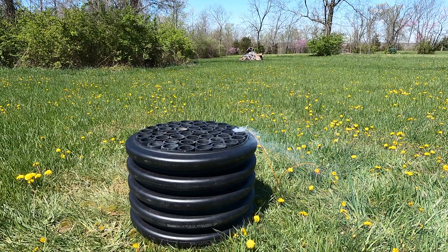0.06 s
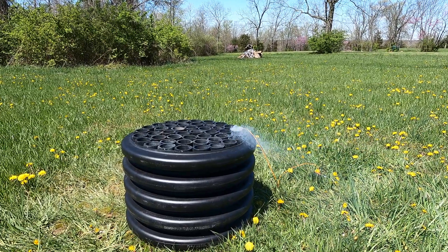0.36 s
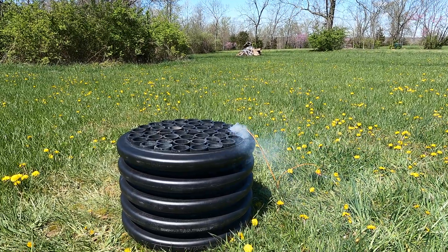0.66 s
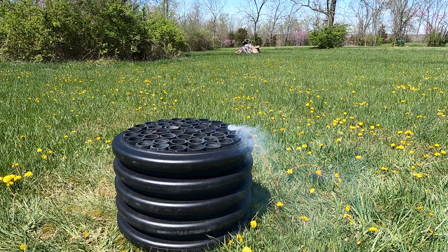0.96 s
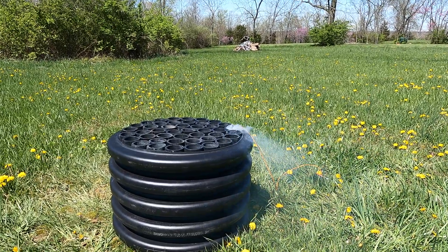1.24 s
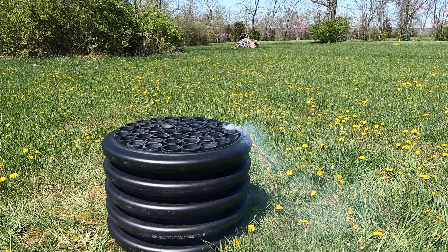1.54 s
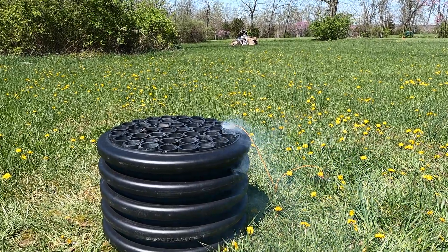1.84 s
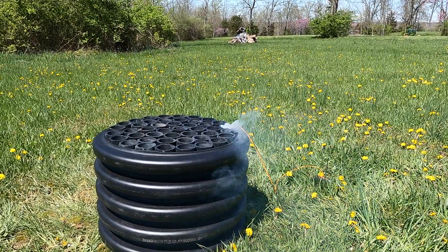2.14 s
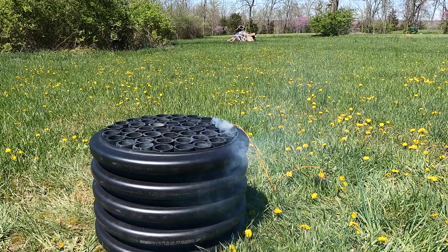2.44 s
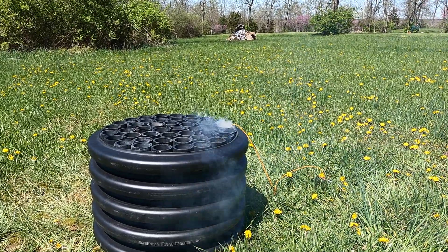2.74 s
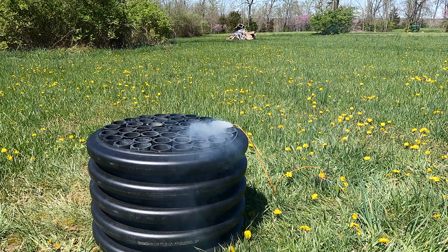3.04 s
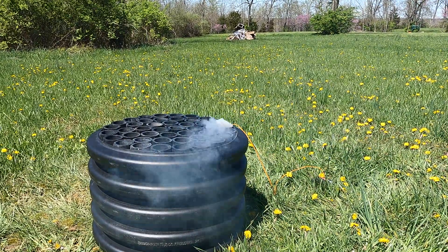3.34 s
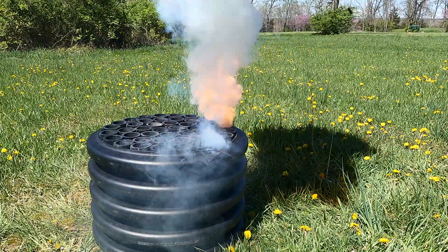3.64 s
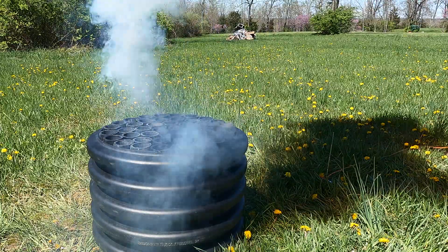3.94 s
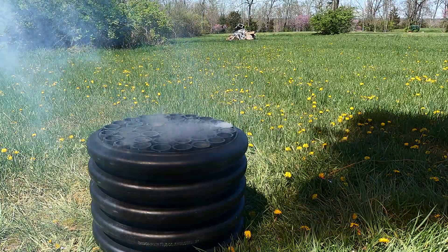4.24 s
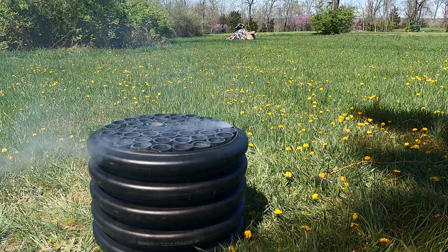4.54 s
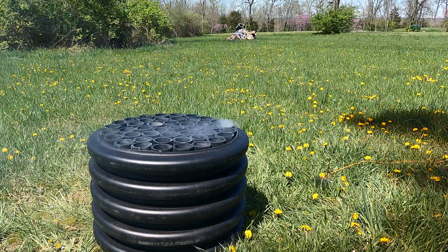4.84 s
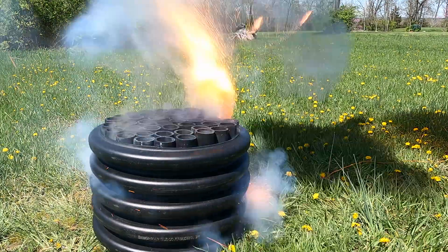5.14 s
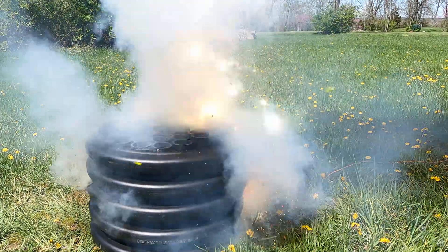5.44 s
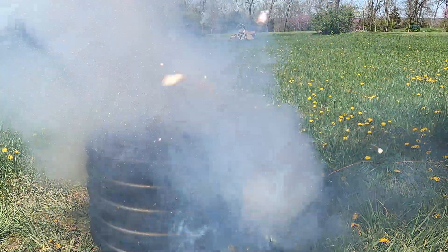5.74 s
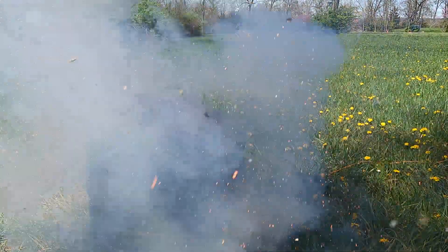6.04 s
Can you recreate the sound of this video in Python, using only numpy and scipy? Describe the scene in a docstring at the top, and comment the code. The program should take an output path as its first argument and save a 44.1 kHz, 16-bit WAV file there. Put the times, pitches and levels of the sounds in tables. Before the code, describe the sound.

From the start, a firework fuse hisses and sputters in uneven surges, slightly to the right, drawing a hollow, wavering hum from the tubes of a plastic mortar rack. Light wind rumbles on the microphone throughout. At about 3.6 seconds the lift charge fires with a loud, sharp bang, a low thump and a short gust of gas, and the rack rings very briefly. A quieter, duller hiss continues inside the tube, falling in pitch until about 4.3 seconds. The wind swells just before 5 seconds. At about 5.2 seconds the shell bursts with a second loud, sharp crack. A low, fluttering roar of burning stars follows at once, with soft thumps and gritty crackles, strongest around 5.5 seconds, and a thin fizz rises toward the end at about 6 seconds. The setting is an open field, with only a faint echo after each blast.

```python
"""A sputtering hiss comes first: a firework fuse burns in a plastic mortar rack in an open field, and its
jet excites the resonances of the hollow tubes. The lift charge fires with a crack and a gust of gas;
a delay fuse hisses on inside the tube, then the shell bursts in the rack and its stars burn with a
fluttering roar. A light wind rumbles throughout, and a tree line returns a faint echo of the blasts."""
import sys
import numpy as np
from scipy import signal
from scipy.fft import rfft, irfft, next_fast_len
from scipy.io import wavfile
from scipy.ndimage import uniform_filter1d

SR = 44100
rng = np.random.default_rng(int(sys.argv[2]) if len(sys.argv) > 2 else 0)


def unload_audio(sound):
    """Save the sound as a 16-bit wav file, at the path given as the first command line argument."""
    columns = np.transpose(np.atleast_2d(sound))
    # keep every value between -1 and 1, then stretch to whole-number steps
    steps = np.round(np.clip(columns, -1, 1) * 32767)
    wavfile.write(sys.argv[1], SR, steps.astype(np.int16))


N = 268569

# Levels are relative; a spectrum lists power density against frequency.
# the open fuse between surges: t/s, lowest tube mode/dB, upper modes/dB, jet hiss/dB
FUSE_LEVELS = [(0, -42, -41, -44.5), (.11, -49.5, -43.5, -45.5), (.4, -52.5, -42.5, -45.5),
               (.915, -48, -46, -47.5), (.94, -50, -47.5, -51.5), (1.12, -43, -43.5, -52),
               (1.55, -45, -46.5, -53.5), (1.575, -45.5, -45.5, -55), (1.78, -48, -48.5, -56),
               (1.87, -40, -39.5, -50), (2.03, -41.5, -43.5, -48), (2.2, -53, -44.5, -47.5),
               (2.6, -56.5, -49, -50), (2.9, -53, -44, -48.5), (3.25, -59, -47.5, -52),
               (3.33, -43, -40.5, -42.5), (3.47, -46.5, -43.5, -44.5), (3.6, -43.5, -47.5, -52)]
# the lowest tube mode, sharper in hot gas: t/s, f/Hz
TUBE_FUNDAMENTAL = [(0, 642.5), (.8, 613.2), (1.75, 621.3), (2.4, 593.3), (3.55, 591), (3.78, 730),
                    (4.05, 668), (4.5, 635), (5.15, 605)]
# the powder burns in surges, a negative rise being a stall: t/s, rise/dB, length/s
FUSE_SURGES = [(0.168, 5.5, 0.037), (0.265, 4, 0.038), (0.461, 6.5, 0.037), (0.57, 6, 0.047),
               (0.73, 5, 0.07), (0.86, 4.5, 0.1), (0.996, -5, .065), (1.05, 8, 0.048), (1.181, 4.5, 0.071),
               (1.255, -2.5, 0.035), (1.298, 4, 0.045), (1.382, 5.5, 0.049), (1.463, 5.5, 0.05),
               (1.53, 5.5, 0.038), (2.075, 2.5, .045), (2.215, -5, 0.031), (2.236, 4.5, 0.03),
               (2.318, 5, 0.018), (2.442, 6, 0.068), (2.686, 5, 0.029), (2.854, 4, 0.04), (2.952, 4, 0.024),
               (3.14, -7, 0.02), (3.171, 4, 0.038), (3.433, 4, 0.02), (3.518, 3, 0.042), (3.77, 3, .06),
               (3.87, 4.5, 0.071), (4.204, 1, 0.086)]
# spectrum of blazing powder: f/Hz, level/dB
BLAZE_SPECTRUM = [(200, -8), (450, 0.5), (750, 1), (1300, 1), (2500, -1), (4200, -7.5), (6000, -15),
                  (10000, -41), (15000, -60)]
# left-right coherence of the fuse flame: f/Hz, coherence
FLAME_COHERENCE = [(30, 0.99), (125, 1), (640, 0.97), (1400, 1), (3100, 0.94), (7000, 1), (9500, 0.93),
                   (13000, 0.65)]
HUM_GROWTH, HISS_GROWTH = 1.67, 1.05  # dB for each dB of surge


def amp(db):
    """Amplitude ratio of a level in decibels."""
    return 10 ** (np.asarray(db) / 20)


def unit(x):
    """Normalisation to rms 1."""
    return x / np.sqrt(np.mean(x ** 2) + 1e-20)


def clock():
    """The time of every sample."""
    return np.arange(N) / SR


def along(points, hz):
    """Interpolation of (f/Hz, value) points on a logarithmic frequency axis."""
    f, values = np.transpose(points)
    return np.interp(np.log(hz + 1), np.log(f + 1), values)


def curves(rows, t):
    """Linear interpolation, at the times t, of each column after the first."""
    times, *columns = np.transpose(rows)
    return [np.interp(t, times, column) for column in columns]


def gate(start, end, fade=0.025):
    """A trapezoidal window between two times."""
    return np.clip((clock() - start) / fade, 0, 1) * np.clip((end - clock()) / fade, 0, 1)


def wobble(rate, size=N):
    """Random modulation with rate knots a second."""
    knots = rng.standard_normal(int(size * rate / SR) + 2)
    return np.interp(np.arange(size) * rate / SR, np.arange(len(knots)), knots)


def filtered(x, response):
    """Linear filtering: the spectrum of x is multiplied by a frequency response."""
    size = x.shape[-1]
    padded = next_fast_len(size + 4096, real=True)
    return irfft(rfft(x, padded) * response(np.fft.rfftfreq(padded, 1 / SR)), padded)[..., :size]


def noise(grain_db, size=N):
    """Two white noises, made grainy by amplitude modulation on a millisecond scale."""
    return rng.standard_normal((2, size)) * amp(grain_db * wobble(700, size))


def spread(hz, coherence):
    """Mid and side gains: the higher the coherence, the less power goes to the side."""
    alike = np.clip(along(coherence, hz), -1, 1)
    return np.sqrt([1 + alike, 1 - alike])


def rush(spectrum, coherence, grain_db=0, size=N):
    """Turbulence radiates broadband noise, here in stereo at rms 1."""
    mid, side = filtered(noise(grain_db, size), lambda hz: amp(along(spectrum, hz)) * spread(hz, coherence))
    return unit(np.array([mid + side, mid - side]))


def peak(hz, centre, width):
    """Gain of one resonance with steep skirts."""
    return 1 / (1 + ((centre ** 2 - hz ** 2) / (1.58 * width * (hz + 1))) ** 2)


def surge_db(rows, t):
    """Level follows the burning rate: each surge flares quickly and sinks more slowly."""
    lag_s, attack_share = 0.0031, 0.39
    grid = clock()[::32]

    def bell(age, length):
        width = length * np.where(age < 0, attack_share, 1 - attack_share)
        return .5 ** (age / width) ** 2
    return np.interp(t, grid, sum(db * bell(grid - s - lag_s, length) for s, db, length in rows))


def sputter_db(per_s=35, jump_db=2.7, fade_s=0.02):
    """Spurts of flame form a Poisson process: each lifts the level at once, then fades."""
    spurts = rng.random(N) < per_s / SR
    rise = signal.lfilter([jump_db], [1, -np.exp(-1 / (fade_s * SR))], spurts)
    return rise - rise.mean()


def puff(s, db, rise, t60, spectrum, grain_db):
    """A noise transient: exponential growth up to time s, then exponential decay."""
    # left-right coherence of the transient: f/Hz, coherence
    coherence = [(30, .95), (125, 1), (500, 0.98), (2000, 0.78), (5000, 0.81), (9000, 0.67), (12500, 0.4)]
    size, start = SR // 4, round(s * SR) - SR // 20
    t = (start + np.arange(size)) / SR - s
    envelope = np.exp(np.minimum(t, 0) / rise) * amp(db - 60 * np.maximum(t, 0) / t60)
    out = np.zeros((2, N + size))
    out[:, start:start + size] = envelope * rush(spectrum, coherence, grain_db, size)
    return out[:, :N]


def thud(s, hz, db, rise):
    """A heavily damped pressure oscillation grows and dies within a few cycles."""
    t = np.arange(SR // 5) / SR
    swing = -amp(db) * t / rise * np.exp(1 - t / rise) * np.sin(2 * np.pi * hz * t)
    return np.pad(swing, (round(s * SR), N))[:N]


def wind():
    """Turbulent pressure on the microphone is heard as a low rumble."""
    # the low rumble swells, dips and swells again: t/s, level/dB
    levels = [(0, -44.5), (2.7, -44), (3.15, -42.5), (3.35, -49), (4, -50), (4.55, -48), (4.72, -37.5),
              (4.92, -36.5), (5.2, -46.5), (6.09, -45)]
    # spectrum of the rumble: f/Hz, level/dB
    spectrum = [(10, -5.5), (25, -1), (45, -1.5), (80, -4.5), (130, -16.5), (200, -21.5), (330, -39.5),
                (800, -69), (2000, -71)]
    # its left-right coherence: f/Hz, coherence
    coherence = [(30, 0.97), (130, 0.9)]
    return amp(curves(levels, clock())[0] + 3.5 * wobble(9)) * rush(spectrum, coherence)


def tree_line(x, delay_s=.1):
    """Scattering from distant trees returns a delayed, diffuse echo."""
    # decay of the echo: f/Hz, t60/s
    decay = [(100, .9), (1000, 1), (8000, 1)]
    hz, t, z = signal.stft(rng.standard_normal((2, SR)), SR, nperseg=256)
    tail = signal.istft(z * amp(-60 * t / along(decay, hz)[:, None]), SR, nperseg=256)[1]
    tail = np.pad(tail / np.linalg.norm(tail[0]), ((0, 0), (round(delay_s * SR), 0)))
    return signal.fftconvolve(x.mean(axis=0)[None], tail, axes=1)[:, :N]


def flame_rush(fade_db_per_s=1.1, shielding_db=11.5):
    """Low combustion noise follows the surges and is shielded once the flame sinks into the tube."""
    # spectrum of the flame: f/Hz, level/dB
    spectrum = [(40, -15), (90, 0.5), (140, -3.5), (210, -2), (265, -10.5), (289, -4.5), (320, -14),
                (440, -19), (700, -24), (2000, -86)]
    t = clock()
    hidden = np.clip((t - 3.81) / 0.31, 0, 1)
    level = -43 - fade_db_per_s * t + 0.78 * surge_db(FUSE_SURGES, t) - shielding_db * hidden
    return amp(level + 1.84 * wobble(20)) * rush(spectrum, FLAME_COHERENCE)


def patches(shape):
    """Turbulence favours ever new bands, a few hundred Hz wide and a tenth of a second long."""
    field = rng.standard_normal(shape)
    for _ in range(2):
        field = uniform_filter1d(uniform_filter1d(field, size=9, axis=0), size=20, axis=1)
    return unit(field)


def burning(levels, upper_modes, jet, hum_width_hz, grain_db, patchy_db, trim_db):
    """Source and filter: jet noise drives the tube; hum, upper modes and hiss add in power."""
    hz, t, z = signal.stft(noise(grain_db), SR, nperseg=1024, noverlap=768)
    hz = hz[:, None]
    hum = peak(hz, curves(TUBE_FUNDAMENTAL, t)[0], hum_width_hz)
    shifting = amp(patchy_db * patches(z.shape[1:]))
    gains = [hum, shifting * upper_modes(hz, t), shifting * jet(hz, t)]
    surging = curves(levels, t) + np.outer([HUM_GROWTH, 1, HISS_GROWTH], surge_db(FUSE_SURGES, t))
    power = sum(amp(db + trim) ** 2 * gain ** 2 / np.mean(gain ** 2, axis=0)
                for gain, db, trim in zip(gains, surging, trim_db))
    shaped = z * np.sqrt(power / 2) * spread(hz, FLAME_COHERENCE)
    mid, side = signal.istft(shaped, SR, nperseg=1024, noverlap=768)[1][:, :N]
    return np.array([mid + side, mid - side])


def delay_fuse():
    """A lengthening pipe falls in pitch: deep in the tube, the fuse's sleeve colours a duller hiss."""
    # the fuse inside the tube: t/s, lowest tube mode/dB, upper modes/dB, jet hiss/dB
    levels = [(3.71, -54, -61.5, -56.5), (4.05, -55.5, -57, -64.5), (4.26, -51, -53.5, -59),
              (4.4, -53, -53.5, -61), (4.9, -53.5, -52, -60.5), (5.18, -56, -55, -62)]
    # tube modes around it: f/Hz, width/Hz, level at first/dB, level deep inside/dB
    tube_modes = [(1420, 150, -4, 2), (2047, 150, 1.5, -0.5), (3270, 180, -1.5, -6), (4570, 230, -14, -20)]
    # resonance of the burnt-out sleeve: t/s, f/Hz
    sleeve_pitch = [(3.7, 7000), (3.88, 5750), (4.07, 4650), (4.21, 3200), (4.3, 2480), (4.7, 2350),
                    (5.2, 2250)]
    # spectrum of the jet: f/Hz, level/dB
    spectrum = [(400, -5), (900, 6), (2500, 5), (4500, -1), (6000, -8.5), (7500, -11), (8500, -15.5),
                (10700, -23.5), (12000, -18), (14000, -40)]
    descent_s = [4.2, 4.4]  # the flame passes into the depth of the tube

    def modes(hz, t):
        return sum(amp(np.interp(t, descent_s, [first, deep])) * peak(hz, centre, width)
                   for centre, width, first, deep in tube_modes)

    def jet(hz, t):
        sleeve_hz = curves(sleeve_pitch, t)[0]
        sleeve = np.interp(t, [3.7, descent_s[0]], [5, 12]) * peak(hz, sleeve_hz, .18 * sleeve_hz)
        overtone_hz = 4.04 * sleeve_hz
        overtone = 9.5 * peak(hz, overtone_hz, 650) - 4 * peak(hz, 1.1 * overtone_hz, 650)
        return amp(along(spectrum, hz) + sleeve + np.interp(t, descent_s, [0, 1]) * overtone)
    flame = burning(levels, modes, jet, hum_width_hz=73, grain_db=1, patchy_db=0.87,
                    trim_db=(0, -.3, 4.5))
    return flame * gate(3.69, 5.3)


def tube_tone(waver_per_s=64):
    """A resonance driven by noise: the lowest tube mode wavers and swells with each surge."""
    t = clock()
    waver = wobble(waver_per_s) + 1j * wobble(waver_per_s)
    phase = 2 * np.pi * np.cumsum(curves(TUBE_FUNDAMENTAL, t)[0]) / SR
    level = -2.45 + curves(FUSE_LEVELS, t)[0] + HUM_GROWTH * surge_db(FUSE_SURGES, t)
    return amp(level) * unit(np.real(waver * np.exp(1j * phase)))


def open_fuse():
    """Source position sets the strength of each mode: the spitting flame creeps along the rack."""
    # upper tube modes: f/Hz, width/Hz, level/dB with the flame at each of four places
    tube_modes = [(1530, 203, -0.5, -0.5, 2, 3), (1918, 177, 4.5, -6, -8, -16),
                  (2370, 260, -32, -33, -26, -9), (2695, 134, 2.5, 3.5, -3.5, 1),
                  (3180, 206, -3, 4, -12, -7), (3877, 135, -8, -3.5, -7, -3.5),
                  (4220, 130, -18, -11, -8, -34), (4690, 146, -5, -7, -11, -3.5)]
    # the flame leaves place 1, reaches and leaves places 2 and 3, reaches place 4: t/s
    journey = [.33, .6, .88, 1.05, 2, 2.6]
    # pipe resonance of the burnt-out sleeve: t/s, f/Hz
    sleeve_pitch = [(0, 7540), (.7, 8100), (1.2, 9000), (1.52, 9300), (1.6, 7750), (1.9, 7500), (2.2, 5300),
                    (2.9, 4800), (3.6, 4867)]
    # a hollow band sinking through the hiss: t/s, f/Hz
    notch_pitch = [(0, 6000), (1.1, 5300), (1.8, 5200), (2.2, 4605), (2.9, 4200), (3.6, 4000)]
    # spectrum of the jet: f/Hz, level/dB
    spectrum = [(150, -25), (420, 0), (750, 2.5), (1250, 2.5), (2300, -27), (3500, -1.5), (5200, 2.5),
                (7000, -5), (10000, -12.5), (12300, -14), (13500, -26), (15500, -54)]

    def modes(hz, t):
        drift = (curves(TUBE_FUNDAMENTAL, t)[0] / 612) ** 0.4
        return sum(amp(np.interp(t, journey, [first, second, second, third, third, last]))
                   * peak(hz, centre * drift, width)
                   for centre, width, first, second, third, last in tube_modes)

    def jet(hz, t):
        sleeve_hz = curves(sleeve_pitch, t)[0]
        sleeve = 5.6 * peak(hz, sleeve_hz, 750) - 1.4 * peak(hz, 1.1 * sleeve_hz, 770)
        notch = -5 * peak(hz, curves(notch_pitch, t)[0], 420)
        ripple = 0.8 * np.cos(2 * np.pi * hz / 930)  # a reflection off the rack lid ripples the hiss with evenly spaced peaks
        early_dullness = np.interp(t, journey[2:4], [-5.5, 0]) * peak(hz, 11900, 6000)
        return amp(along(spectrum, hz) + sleeve + notch + ripple + early_dullness)
    flame = burning(FUSE_LEVELS, modes, jet, hum_width_hz=90, grain_db=1.53, patchy_db=2.0,
                    trim_db=(-2.5, .3, -1.2))
    flutter = amp(sputter_db())
    spits = sum(puff(s + 0.00194, -53 + 2 * db, .002, .035, BLAZE_SPECTRUM, grain_db=2.5)
                for s, db, _ in FUSE_SURGES if db > 0)
    return (flame * flutter + tube_tone() + spits) * gate(-1, 3.625)


def crackles():
    """Brief bursts of modulated noise are heard as gritty snaps, each with a pitch of its own."""
    # gritty ticks just before the burst, then crackles among the stars: t/s, level/dB, f/Hz
    snaps = [(5.2155, -36, 1700), (5.226, -29, 1700), (5.3346, -33.5, 2510), (5.3498, -30.5, 1880),
             (5.434, -40, 2980), (5.463, -38, 1700), (5.496, -37, 1900), (5.5545, -35, 2600),
             (5.5672, -34.5, 2200), (5.671, -40, 2200)]
    # spectrum of a snap: multiple of its pitch, level/dB
    shape = [(.15, -0.5), (.7, -3), (1.1, -6), (1.8, -10), (6, -47)]
    return sum(puff(s, db, rise=.003, t60=.06, spectrum=np.multiply(shape, [hz, 1]), grain_db=5.5)
               for s, db, hz in snaps)


def stars(start_s=5.285, attack_s=0.076):
    """Unsteady combustion radiates sound: the stars whoosh alight, roar, thump and end in a fizz."""
    # clumps of stars catch fire, a negative rise being a lull: t/s, rise/dB, length/s
    clumps = [(5.335, -4, 0.053), (5.393, -6, 0.014), (5.49, 5, 0.088), (5.552, 6, 0.075),
              (5.665, 3, 0.068)]
    # flares of burning stars: t/s, level/dB, f/Hz
    flares = [(5.335, -20.5, 165.3), (5.35, -17.5, 155), (5.409, -25, 169), (5.436, -24, 140),
              (5.46, -21, 183), (5.493, -18, 125.4), (5.538, -19.5, 149), (5.562, -17.5, 294),
              (5.567, -15, 136), (5.617, -18, 129), (5.637, -21, 100.9), (5.658, -20, 104),
              (5.842, -25.5, 168.4), (6.034, -15, 109)]
    # spectra of the low roar, the sparks and the ignition: f/Hz, level/dB
    roar_spectrum = [(30, -32), (70, -4), (110, 0.5), (180, 0.5), (260, -9.5), (400, -21), (700, -48),
                     (2000, -80)]
    fizz_spectrum = [(1500, -25), (4500, -1), (7000, -4), (10000, -12), (12400, -14), (14000, -27),
                     (16000, -57)]
    whoosh_spectrum = [(1000, -15), (4500, 1), (7500, -3), (10000, -19), (13000, -26), (15000, -48)]
    # left-right coherence of the scattered stars: f/Hz, coherence
    coherence = [(130, 1), (290, 0.98), (640, 0.92), (1400, 0.83), (3100, 0.59), (7000, 0.96), (13000, .65)]
    t = clock()
    surge = surge_db(clumps, t)
    catching = np.clip((t - start_s) / attack_s, 0, 1) ** 2
    roar = amp(-36.5 + surge) * catching * rush(roar_spectrum, coherence)
    blaze = amp(-47 + 0.6 * surge + 0.95 * sputter_db()) * rush(BLAZE_SPECTRUM, coherence, grain_db=1.5)
    last_sparks_db = 21 * np.maximum(t - 5.66, 0)
    fizz = amp(-61 + 0.18 * surge + last_sparks_db) * rush(fizz_spectrum, coherence, grain_db=2)
    thumps = sum(thud(s, hz, db, rise=0.6 / hz) for s, db, hz in flares)
    whoosh = puff(5.317, -46, rise=.009, t60=.25, spectrum=whoosh_spectrum, grain_db=-1)
    return (roar + blaze + fizz) * catching + thumps + whoosh


def rack():
    """Free vibration: after each blast the plastic rack rings in damped modes."""
    # modes of the rack: f/Hz, level/dB, t60/s
    modes = [(290.7, -25.5, 0.18), (518, -24.5, 0.12), (1330, -37, 0.22), (1465, -38, 0.22),
             (1690, -31.5, 0.13)]
    # blows of the two blasts: t/s, level/dB
    blows = [(3.645, -2), (5.236, -1)]
    t = np.arange(SR // 3) / SR

    def ring():
        return sum(amp(db - 60 * t / t60) * np.sin(2 * np.pi * (hz * t + rng.random()))
                   for hz, db, t60 in modes)
    return sum(np.pad(amp(db) * ring(), (round(s * SR), N))[:N] for s, db in blows)


def swell(end_s=5.234, rise_s=.0175):
    """Random amplitude modulation roughens two tones that rise briefly and break off at the burst."""
    # the tones: f/Hz, left level/dB, right level/dB
    partials = [(906, -15.5, -19.5), (140, -28, -14.5)]
    t = np.arange(-SR // 25, 0) / SR
    tones = np.zeros((2, len(t)))
    for hz, left_db, right_db in partials:
        envelope = amp(2 * wobble(350, len(t))) * np.exp(-(t / rise_s) ** 2)
        tones += amp([[left_db], [right_db]]) * envelope * np.sin(2 * np.pi * (hz * t + rng.random()))
    return np.pad(tones, ((0, 0), (round(end_s * SR) - len(t), N)))[:, :N]


def blast_thuds():
    """Impulsive excitation: both blasts set off brief pressure swings of tube and rack."""
    # the swings: t/s, f/Hz, level/dB, rise/s
    swings = [(3.626, 149, -17.5, .003), (3.6303, 600, -8, 0.0013), (3.645, 32.6, -15.5, 0.01),
              (3.6569, 184, -16.5, 0.0074), (3.679, 86.5, -16.5, 0.0043), (5.238, 89, -20, 0.0021),
              (5.2409, 212, -18.5, 0.0053)]
    return sum(thud(*swing) for swing in swings)


def lift_charge():
    """Sudden expansion: gas first leaks, then leaves the tube in a gust."""
    # spectra of the leak and the gust: f/Hz, level/dB
    leak_spectrum = [(100, 1), (600, 1.5), (2000, 0), (3200, -9.5), (5500, -11.5), (8000, -21.5),
                     (12500, -30), (15500, -51)]
    gust_spectrum = [(40, -14), (90, 9), (200, 0), (320, 4.5), (420, 3), (600, 2), (950, -5), (1250, -2),
                     (1700, -12), (4400, -17), (7500, -28), (12500, -41), (15500, -66)]
    leak = puff(3.63, -16.5, rise=.0045, t60=.012, spectrum=leak_spectrum, grain_db=-2)
    gust = puff(3.6535, -14, rise=.0085, t60=.085, spectrum=gust_spectrum, grain_db=0.5)
    return leak + gust


def shell_burst():
    """Rupture under pressure: the shell cracks open, releases its gas and shakes the rack."""
    # a faint tick, then the two sharp cracks of the burst: t/s, level/dB, rise/s, t60/s
    transients = [(5.1945, -35, .0004, .012), (5.2353, -9.5, .0002, .009), (5.2371, -9.5, .00035, .008)]
    # spectra of these transients, the gust and the shaken rack: f/Hz, level/dB
    crack_spectrum = [(100, -4), (700, 2.5), (1100, 2.5), (1600, -8), (2200, 2), (2850, -21), (3900, -4),
                      (5600, -11), (8800, -24), (12200, -25), (15500, -43)]
    gust_spectrum = [(60, -9), (310, 5), (600, -8), (1200, 5.5), (1800, -2), (2700, 0), (3300, -9),
                     (5700, -9), (11300, -28), (15500, -48)]
    ring_spectrum = [(200, 0), (650, -5), (1550, -12), (2200, -14), (4000, -24), (9000, -35)]
    tick_and_cracks = sum(puff(*row, crack_spectrum, grain_db=1.5) for row in transients)
    gust = puff(5.243, -23, rise=.005, t60=.075, spectrum=gust_spectrum, grain_db=1)
    ring = puff(5.26, -38.5, rise=.007, t60=.2, spectrum=ring_spectrum, grain_db=1)
    return tick_and_cracks + gust + ring


def scene():
    """Superposition in the open air; a level difference places fuses and blasts a little to the right."""
    # balance of fuses, flame and wind: f/Hz, left minus right level/dB
    balance = [(110, -.3), (380, -2), (700, -2), (1300, -3), (2400, -3), (4400, -1), (8000, -0.5)]
    bangs = lift_charge() + shell_burst() + blast_thuds() + swell() + rack()
    steady = open_fuse() + delay_fuse() + wind() + flame_rush()
    steady = filtered(steady, lambda hz: amp(np.outer([.5, -.5], along(balance, hz))))
    direct = steady + bangs * amp([[-.5], [.5]]) + stars() + crackles()
    return direct + amp(-39.5) * tree_line(bangs)


def record(dry):
    """Saturation in the microphone rounds the loudest peaks; its band limit removes the highest treble."""
    ceiling, top_hz = .56, 16000
    rounded = dry / (1 + np.abs(dry / ceiling) ** 6) ** (1 / 6)
    return filtered(rounded, lambda hz: 1 / np.sqrt(1 + (hz / top_hz) ** 80))


dry = scene()
out = record(dry)
unload_audio(out)
```